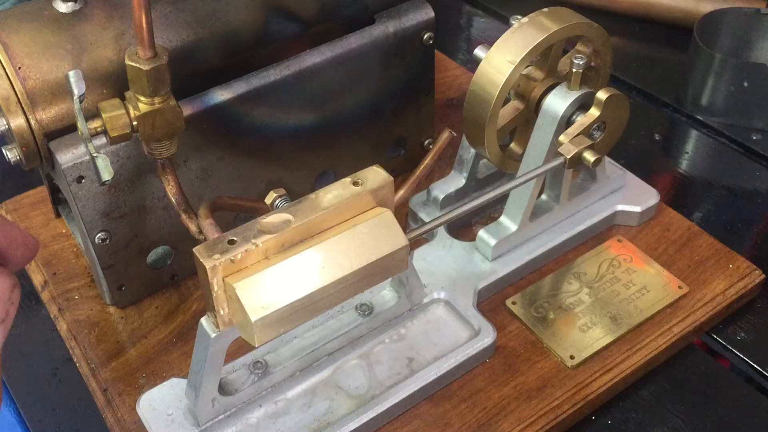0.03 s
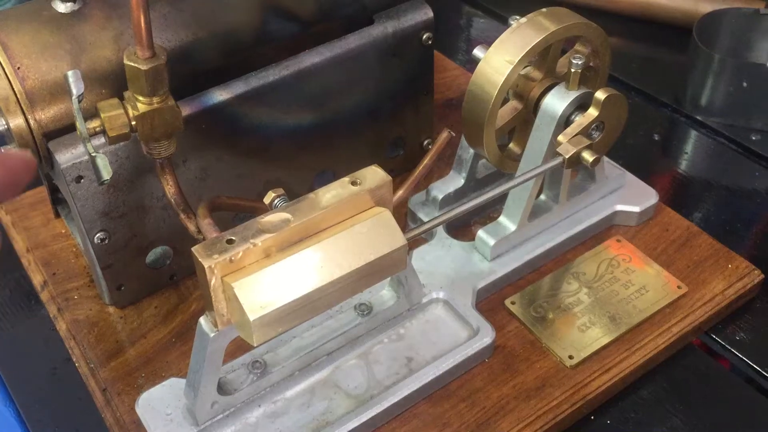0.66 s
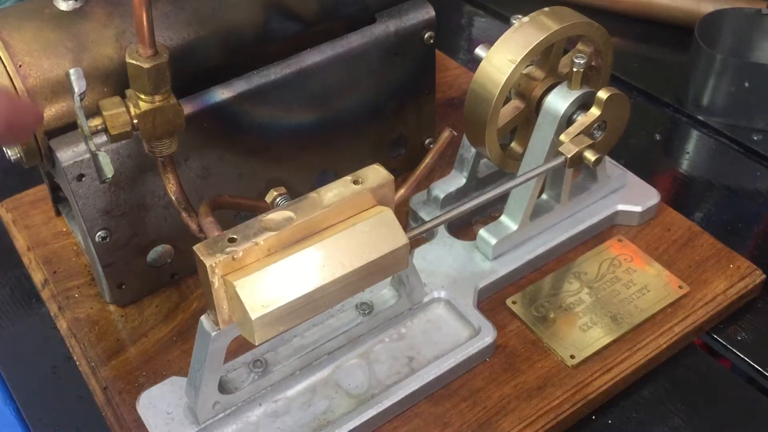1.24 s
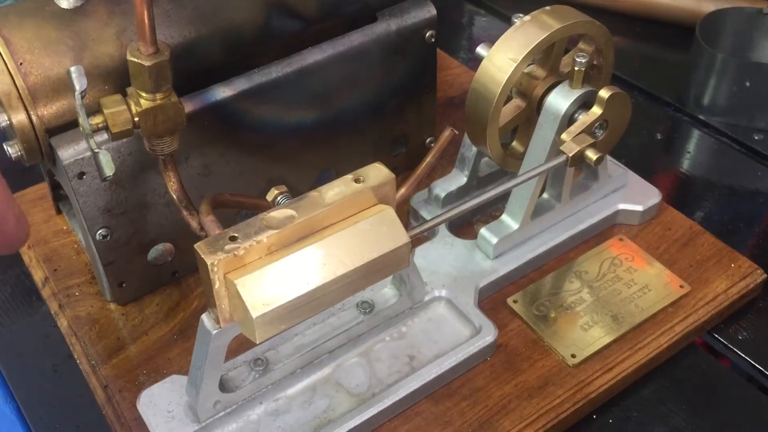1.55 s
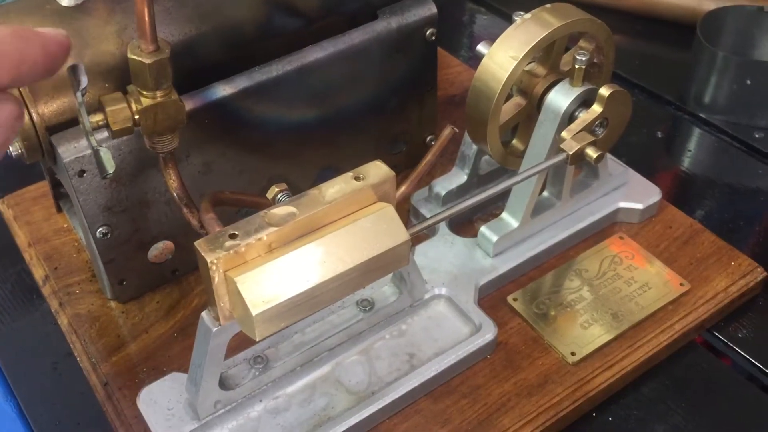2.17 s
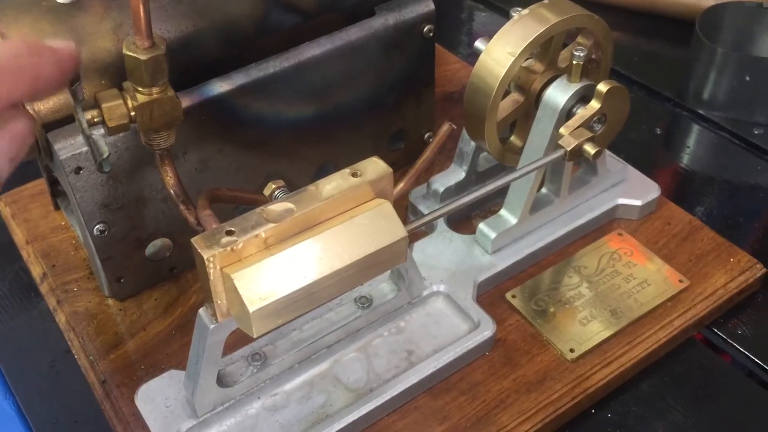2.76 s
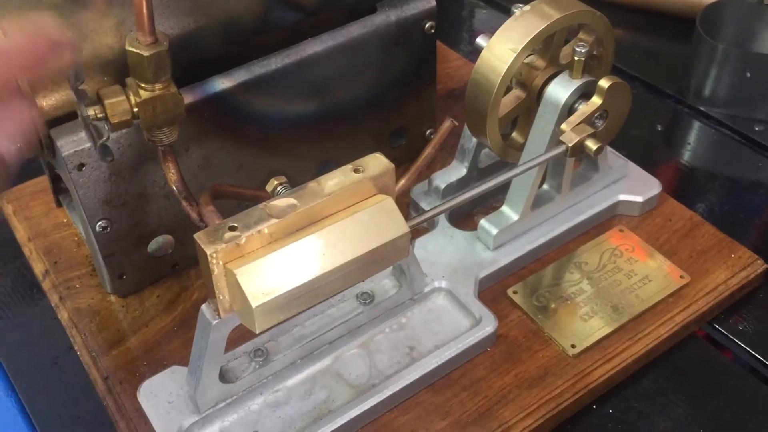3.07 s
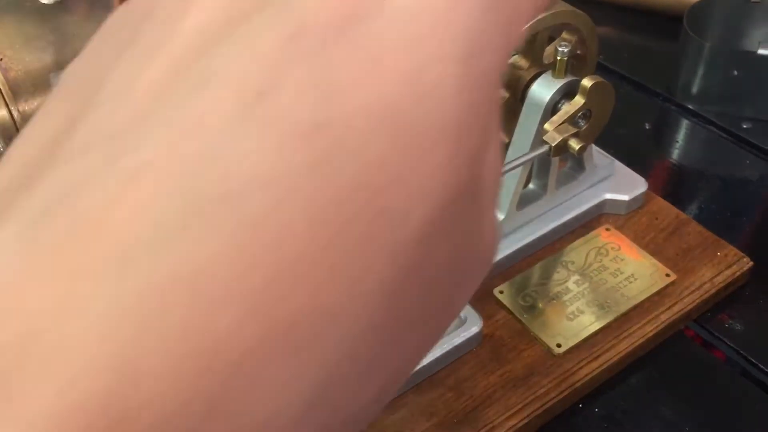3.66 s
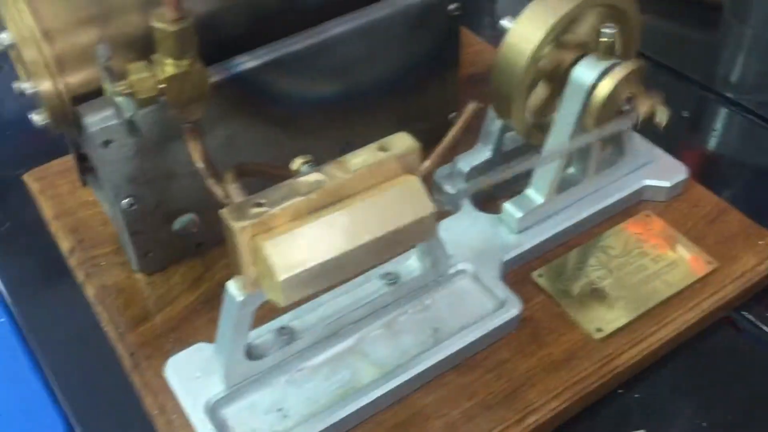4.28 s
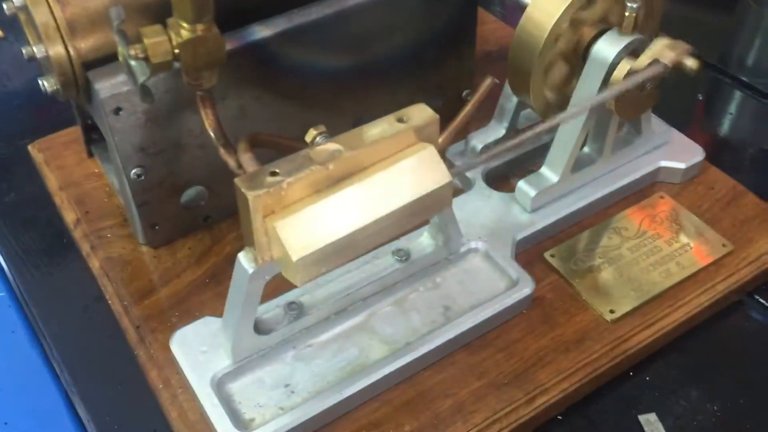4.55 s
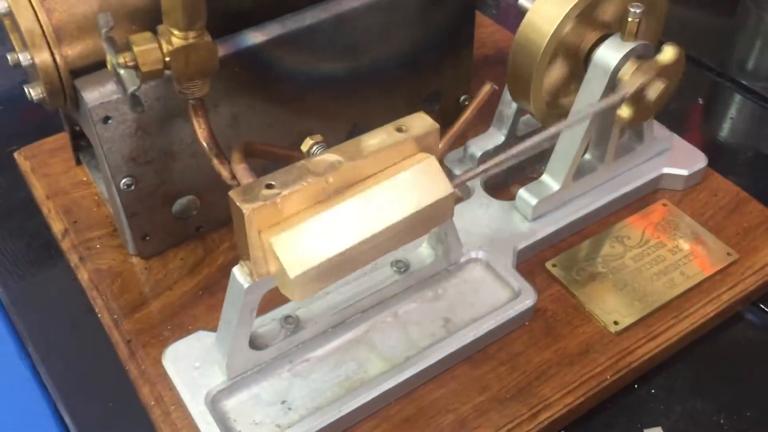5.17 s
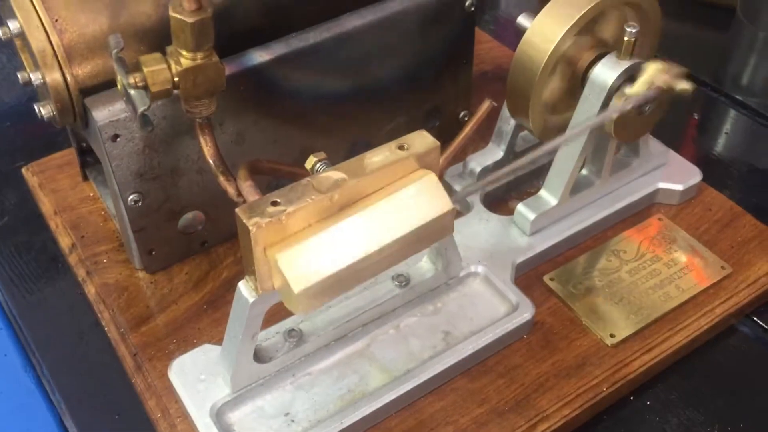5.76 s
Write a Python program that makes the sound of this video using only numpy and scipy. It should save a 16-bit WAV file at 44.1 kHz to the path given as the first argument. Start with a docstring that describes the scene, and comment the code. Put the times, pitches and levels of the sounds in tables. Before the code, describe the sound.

A small steam engine hisses and spits wetly, then starts running with sharp, quickening puffs over a low workshop drone.

```python
"""A wet, fluttering hiss, dotted with spits and gurgles, close by over a low workshop drone.
It is a small oscillating steam engine standing on its wooden base, leaking steam and water at the port face.
An arm reaches over and shades the hiss, then the engine runs, faster and faster. Every turn pops the
exhaust open, thumps the base, throws out a spray of condensate and pushes a swell of steam after it."""
import sys
import numpy as np
from scipy import signal
from scipy.fft import rfft, irfft
from scipy.io import wavfile
from scipy.ndimage import uniform_filter1d

SR = 44100
rng = np.random.default_rng(int(sys.argv[2]) if len(sys.argv) > 2 else 0)


def int16_out(signal):
    """Quantize to a 16-bit WAV file."""
    q = np.round(np.clip(np.atleast_2d(signal).T, -1, 1) * 32767)
    wavfile.write(sys.argv[1], SR, q.astype(np.int16))


N = 261072
TIME = np.arange(N) / SR

# Exhaust openings, one a turn. Each row: start in seconds, then pop, thump and swell in relative dB.
STROKES = [(4.214, -53, -8, -27), (4.5622, -39, -9.5, -26.5), (4.8447, -17.5, -1.5, -26.5),
           (5.0907, -20.5, -7, -28), (5.3040, -20, -2.5, -29), (5.4956, -11, 0.5, -29),
           (5.6502, -11, 0, -27.5), (5.8154, -9, 2.5, -28.5)]
# Steam blowing past the port face over one turn. Each row: share of the turn, level in dB.
BLOWBY_OVER_TURN = [(0, -24.5), (.08, -23), (.17, -29), (.3, -34.5), (.45, -29.5), (.6, -30), (.8, -33.5),
                    (.9, -32), (.96, -37.5)]
# The featured spits of condensate. Each row: start in seconds, then spray and plop in relative dB.
SPITS = [(0.1234, -29.5, -52.5), (0.1862, -44, -36), (0.3684, -32, -52), (0.4513, -27, -38),
         (0.652, -32.5, -45), (0.8314, -31.5, -48.5), (0.949, -30, -52), (1.3312, -33, -47),
         (1.4478, -31, -58), (1.8249, -33, -43), (2.1898, -30, -51), (2.3628, -31, -42.5),
         (2.5055, -30.5, -40.5), (2.6513, -29.5, -47), (2.7795, -32, -44.5), (2.925, -31, -43.5),
         (3.0347, -43, -42.5), (3.2187, -35, -45.5), (3.3482, -29.5, -47), (3.4708, -27, -53),
         (3.6427, -42, -42.5), (3.8175, -37, -40.5), (3.9042, -31, -38.5), (3.9782, -41, -46),
         (4.207, -25, -37), (4.394, -43, -36), (4.4904, -29, -55), (4.5758, -22, -56), (4.865, -26, -51),
         (4.9745, -39, -40), (5.045, -25, -43), (5.11, -24.5, -47), (5.324, -30, -35)]
# Water bubbling in the port gap. Each row: centre in seconds, half-length in seconds, relative dB.
GURGLES = [(0.298, 0.025, -36.5), (0.962, 0.0062, -32.5), (1.012, 0.039, -41.5), (1.73, 0.04, -39.5),
           (1.849, 0.014, -39), (3.365, 0.0061, -37.5)]
# The arm's reach. Each row: time in seconds, share of the leak's path covered from 0 to 1.
ARM_REACH = [(3.45, 0.13), (3.55, 0.4), (3.7, 0.88), (4.17, 0.88), (4.3, 0)]
# Resonances of the engine on its base. Each row: pitch in Hz, width in Hz, gain in dB.
BODY_MODES = [(202, 42, 1.5), (282, 52, 1.5), (516, 58, -0.5), (712, 56, -16), (800, 24, 4.5),
              (968, 39, 2.5), (1443, 86, 3), (1720, 55, -13), (2110, 150, -4), (2534, 27, -3),
              (3450, 280, -3.5)]
# Tone curves of the layers. Each row: frequency in Hz, relative level in dB.
ROOM_COLOUR = [(20, -48), (40, -38), (55, -7), (68, 3), (95, 4), (120, -3), (140, -9), (200, -6),
               (245, -23), (290, -15.5), (450, -39.5), (950, -16.5), (1400, -21.5), (4000, -26)]  # workshop rumble
LEAK_COLOUR = [(300, -19.5), (500, -19.5), (700, -5.5), (1000, -3.5), (1400, -11.5), (1800, 2), (2700, -2),
               (3700, -2), (4000, -7.5), (5600, 2), (9400, 2), (10400, -0.5), (11200, 4), (15800, 0)]  # hiss in the open
SHADED_COLOUR = [(300, -5), (1000, 10), (1500, -8), (2000, 12), (2400, -5), (4000, 2), (5100, -2),
                 (6000, 7.5), (7000, -2), (9200, -1), (10400, -7), (11100, -2), (15800, 0)]  # hiss behind the arm
PLOP_COLOUR = [(100, -16), (280, 0.5), (420, -8.5), (650, -1), (1000, -1), (1400, -10.5), (2000, -1.5),
               (3500, -5.5), (8000, -27.5)]  # a drop's plop
CRACK_COLOUR = [(150, -12), (400, 4.5), (1000, 1), (1400, -7), (2500, 2.5), (6000, 8.5), (10000, 5),
                (15800, -16)]  # a water film bursting
SPRAY_COLOUR = [(200, -9), (900, -2), (1600, -6.5), (2600, -5.5), (4300, -4), (5700, 0), (9400, 1.5),
                (10400, -0.5), (12000, 5), (15800, -0.5)]  # flying condensate
BLOWBY_COLOUR = [(250, -9.5), (900, -9), (1500, -7.5), (2500, -6), (3400, -3), (3850, -4), (4600, -3),
                 (6700, -2), (9000, 1.5), (10400, -1.5), (11200, 0), (15800, 1.5)]  # steam slipping past the ports
SWELL_COLOUR = [(250, -17.5), (1500, -44), (2700, -13), (4800, -6.5), (5300, 0.5), (6100, -8.5), (6600, -1),
                (9400, 2), (10400, -1), (11400, 0), (12600, 3.5), (15800, 3)]  # steam driven out by the piston
# Narrow bands lifted by passages and gaps at the ports. Each row: centre in Hz, width in Hz, lift in dB.
LEAK_PEAKS = [(1920, 94, 3), (2950, 330, 4), (4330, 200, 7.5), (5480, 430, 3), (6300, 340, 4.5),
              (6870, 88, 7), (7250, 140, 6.5), (8450, 250, 4.5), (9130, 270, 5.5), (9660, 470, 4.5),
              (10970, 570, 3), (12840, 250, 2.5), (13000, 200, 6.5), (14500, 460, 7), (15450, 250, 5)]
EXHAUST_PEAKS = [(2860, 690, 3.1), (4330, 290, 2.1), (5770, 220, 5.4), (6400, 290, 2.5), (7160, 200, 1.3),
                 (9300, 740, 2.2), (11350, 440, 4.1), (13200, 170, 2.3), (14000, 270, 1.6), (13700, 330, 3)]

RUN_START_S = STROKES[0][0]
HUM_HZ, HUM_DB, ROOM_DB = 159.6, -61, -49
STANDING_LEAK_DB, RUNNING_LEAK_DB = -37, -42.5  # the leak drops once the engine uses the steam
# At full cover: the arm ducks hiss, cracks and spray, mirrors the hiss and dulls a share of its power.
ARM_LEAK_DB, ARM_SPIT_DB, ARM_MIRROR_DB, ARM_DULL_SHARE = -10.5, -6.5, -12, .8
MIRROR_DELAY_S, MIRROR_SWEEP_S = 0.00019, 0.000362  # shortest delay, and what full cover adds
CRACK_OVER_SPRAY_DB, SPIT_SCATTER_DB = 16, 5
STANDING_SPRAY_FALL_S, RUNNING_SPRAY_FALL_S = 0.0091, 0.0054
GURGLE_HZ, GURGLE_WIDTH_HZ = 1850, 1400
POP_HZ, POP_SPRAY_DB = 2330, -12.5
CREST_TURNS, CREST_TURNS_PER_S = 0.18, 0.4  # the swell crests further into a slow turn


def undb(db):
    """Decibels to gain."""
    return 10 ** (np.asarray(db) / 20)


def unit(x):
    """Scale to rms 1."""
    return x / np.sqrt(np.mean(x ** 2))


def wander(rate):
    """Smooth random drift of rms 1, with about rate bends a second."""
    hold = max(int(SR / rate), 1)
    steps = np.repeat(rng.standard_normal(N)[:N // hold + 1], hold)
    return unit(uniform_filter1d(steps, hold)[:N])


def colour(x, points, peaks=(), size=4096):
    """Causal EQ of unit power through a tone curve, with resonant peaks on top."""
    hz, db = np.transpose(points)
    bins = np.fft.rfftfreq(size, 1 / SR)
    shape_db = np.interp(np.log(bins + 1), np.log(hz), db)
    for centre, width, lift_db in peaks:
        shape_db = shape_db + lift_db * np.exp(-2 * ((bins - centre) / width) ** 2)
    cepstrum = irfft(np.log(unit(undb(shape_db))))[:size // 2]
    cepstrum[1:] *= 2  # minimum phase keeps attacks crisp
    impulse = irfft(np.exp(rfft(cepstrum, size)))
    return signal.fftconvolve(x, impulse)[:N]


def resonate(x, hz, width):
    """One resonance, gain 1 at its centre."""
    return signal.lfilter(*signal.iirpeak(hz, hz / width, SR), x)


def droplets(rate, spread_db):
    """Random clicks, many small and a few large."""
    chance, size = rng.random(N), np.minimum(rng.exponential(size=N), 3)
    return unit((chance < rate / SR) * undb(spread_db * size) * rng.choice([-1, 1], N))


def bursts(times, dbs, rise_s, fall_s):
    """Envelope that swells into each moment and dies away after it."""
    power = np.zeros(N)
    for s, db, fall in np.broadcast(times, dbs, fall_s):
        near = slice(max(int(s * SR) - SR // 20, 0), int(s * SR) + SR // 10)
        age = TIME[near] - s
        power[near] += (undb(db) * np.exp(np.minimum(age / rise_s, -age / fall))) ** 2
    return np.sqrt(power)


def knocks(times, dbs):
    """One pressure impulse at each moment."""
    push = np.zeros(N)
    push[(np.asarray(times) * SR).astype(int)] = undb(dbs)
    return push


def wet_noise(drops_db):
    """Turbulent steam with droplets bursting in it."""
    return unit(rng.standard_normal(N) + undb(drops_db) * droplets(rate=2500, spread_db=8.5))


def room_drone():
    """The bed: low workshop rumble with a wavering hum."""
    rumble = unit(colour(rng.standard_normal(N), ROOM_COLOUR)) * undb(ROOM_DB + 0.55 * wander(16))
    hum = unit(np.sin(2 * np.pi * HUM_HZ * TIME + 1.24 * wander(6)))
    return rumble + hum * undb(HUM_DB + 4.6 * wander(7))


def leak():
    """Steam escapes in a fluttering hiss, duller behind the arm, while water sizzles in the gap."""
    jet = wet_noise(drops_db=-5) * undb(0.97 * wander(25.18) + 0.87 * wander(250))
    cover = arm_cover()
    dull_share = ARM_DULL_SHARE * cover ** 4
    bright = colour(jet * np.sqrt(1 - dull_share), LEAK_COLOUR, LEAK_PEAKS)
    shaded = undb(2.5) * colour(jet * np.sqrt(dull_share), SHADED_COLOUR)
    hiss = bright + shaded
    # the bounce off the moving arm lengthens and sweeps a comb through the hiss
    mirrored = np.interp(TIME - MIRROR_DELAY_S - MIRROR_SWEEP_S * cover, TIME, hiss)
    hiss = hiss + undb(ARM_MIRROR_DB) * cover * mirrored
    hiss_db = np.where(TIME < RUN_START_S, STANDING_LEAK_DB, RUNNING_LEAK_DB) + ARM_LEAK_DB * cover
    sizzle = unit(colour(droplets(rate=200, spread_db=6.0), PLOP_COLOUR))
    return hiss * undb(hiss_db) + sizzle * undb(-56.5 + 3.44 * wander(12))


def arm_cover():
    """How far the arm hides the ports, from 0 to 1."""
    return np.interp(TIME, *np.transpose(ARM_REACH))


def small_spits(start_s, end_s, per_s, spray_db, plop_db, count=60):
    """Water gathers and bursts at uneven intervals, giving rows like those of SPITS."""
    jitter, spray_scatter, plop_scatter = np.clip(rng.standard_normal((count, 3)), -1, 1).T
    times = start_s + (np.arange(count) + .5 + .4 * jitter) / per_s
    rows = np.column_stack([times, spray_db + SPIT_SCATTER_DB * spray_scatter,
                            plop_db + SPIT_SCATTER_DB * plop_scatter])
    return rows[(times > start_s) & (times < end_s)]


def spits():
    """A water film bursts with a crack and a plop; steam sprays through the hole until it closes."""
    standing = small_spits(0, RUN_START_S, per_s=4.5, spray_db=-35.5, plop_db=-50.5)
    running = small_spits(RUN_START_S, TIME[-1], per_s=14, spray_db=-32.5, plop_db=-55)
    times, spray_db, plop_db = np.vstack([SPITS, standing, running]).T
    crack = colour(knocks(times, spray_db + CRACK_OVER_SPRAY_DB), CRACK_COLOUR)
    fall_s = np.where(times < RUN_START_S, STANDING_SPRAY_FALL_S, RUNNING_SPRAY_FALL_S)
    spray = bursts(times + 0.00092, spray_db, rise_s=0.00037, fall_s=fall_s) * wet_noise(drops_db=-12)
    spray = colour(spray, SPRAY_COLOUR, EXHAUST_PEAKS)
    push = knocks(times, plop_db)
    plop = undb(24) * colour(push, PLOP_COLOUR) + undb(28.5) * body(push)
    return (crack + spray) * undb(ARM_SPIT_DB * arm_cover()) + plop


def body(push):
    """The engine and its base ring when knocked; neighbouring modes swing in opposite senses."""
    return sum((-1) ** (k + 1) * undb(db) * resonate(push, hz, width)
               for k, (hz, width, db) in enumerate(BODY_MODES))


def gurgles():
    """Clusters of tiny bubbles in the port gap, each a one-cycle tick."""
    pops = droplets(rate=650, spread_db=3.5)
    bubbles = unit(resonate(resonate(pops, GURGLE_HZ, GURGLE_WIDTH_HZ), GURGLE_HZ, GURGLE_WIDTH_HZ))
    return bubbles * sum(undb(db - 4.5) * np.exp(-((TIME - centre_s) / half_s) ** 2)
                         for centre_s, half_s, db in GURGLES)


def exhaust_pops():
    """The port opens: the passage rings briefly, the water plug leaves with a thump, spray follows."""
    times, pop_db, thump_db, _ = np.transpose(STROKES)
    ring = np.zeros(N)
    for moment, db in zip(times, pop_db):
        near = slice(int(moment * SR) - SR // 100, int(moment * SR) + SR // 100)
        age = TIME[near] - moment
        ring[near] += undb(db) * np.exp(-(age / 0.00063) ** 2) * np.cos(2 * np.pi * POP_HZ * age)
    spray = bursts(times + 0.0029, POP_SPRAY_DB, rise_s=0.0037, fall_s=0.0029) * wet_noise(drops_db=-10)
    rattle = bursts(times + 0.0018, thump_db - 19, rise_s=0.0042, fall_s=0.016) * rng.standard_normal(N)
    push = knocks(times + 0.00032, thump_db)
    thump = undb(-2) * colour(push, PLOP_COLOUR) + body(undb(7.5) * push + rattle)
    return ring + colour(spray, SPRAY_COLOUR) * undb(ARM_SPIT_DB * arm_cover()) + thump


def exhaust_steam():
    """Wet steam blows past the ports; about a quarter turn in, the piston drives out a brighter swell."""
    times, *_, swell_db = np.transpose(STROKES)
    openings = np.append(times, 2 * times[-1] - times[-2])
    turns = np.interp(TIME, openings, np.arange(len(openings)))
    stroke, turn_share = np.minimum(turns.astype(int), len(times) - 1), turns % 1
    running = TIME > RUN_START_S
    blowby_db = np.interp(turn_share, *np.transpose(BLOWBY_OVER_TURN))
    blowby = wet_noise(drops_db=0) * running * undb(blowby_db + 1.84 * wander(200))
    crest = CREST_TURNS + CREST_TURNS_PER_S * np.diff(openings)
    surge = np.exp(-((turn_share - crest[stroke]) / 0.15) ** 2)
    swell = rng.standard_normal(N) * running * undb(swell_db[stroke] + 3.5) * surge
    # the surge blows the ports dry; condensate gathers and drips late in the turn
    blowby = blowby * undb(-4 * surge)
    drips = droplets(rate=120, spread_db=1.5) * running * np.sin(np.pi * turn_share ** 2)
    steam = colour(blowby, BLOWBY_COLOUR, EXHAUST_PEAKS) + colour(swell, SWELL_COLOUR, EXHAUST_PEAKS)
    return steam + undb(-48.5) * colour(drips, PLOP_COLOUR)


def workshop_reverb(x, t60_s, wet_db):
    """Bench and walls add a short, duller tail."""
    tail = rng.standard_normal(N) * undb(-60 * TIME / t60_s) * (TIME > .004)
    tail = colour(tail, [(100, 15.0), (300, 7.0), (2500, -4), (6000, -3), (15000, 0.5)])[:SR // 2]
    return x + undb(wet_db) * signal.fftconvolve(x, tail / np.linalg.norm(tail))[:N]


def scene():
    """The engine in its room, the same in both ears."""
    engine = leak() + gurgles() + spits() + exhaust_steam() + exhaust_pops()
    return np.tile(workshop_reverb(engine, t60_s=0.14, wet_db=-12.5) + room_drone(), (2, 1))


def record(dry, start_s=.12, ceiling=.7, top_hz=15850):
    """The sound cuts in after a moment, its loudest peaks rounded and its very top rolled off."""
    rounded = ceiling * np.tanh(dry * (TIME >= start_s) / ceiling)
    return signal.sosfilt(signal.ellip(12, .1, 80, top_hz, fs=SR, output="sos"), rounded)


dry = scene()
out = record(dry)
int16_out(out)
```